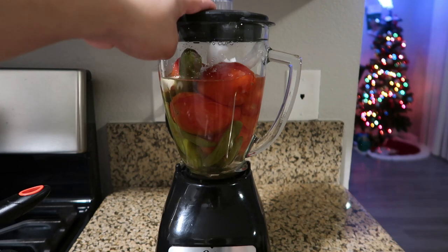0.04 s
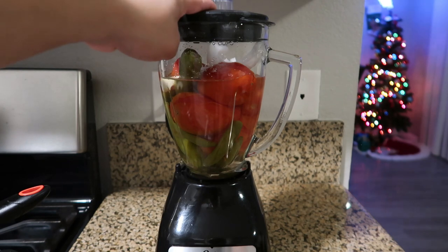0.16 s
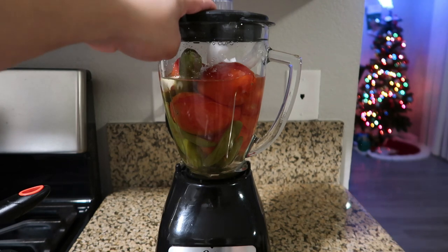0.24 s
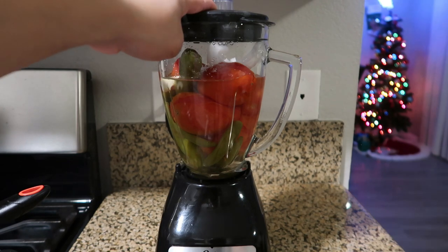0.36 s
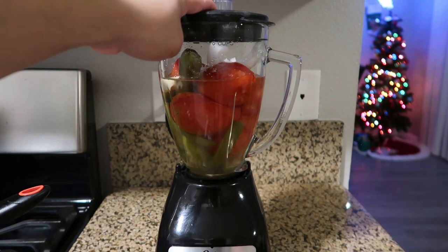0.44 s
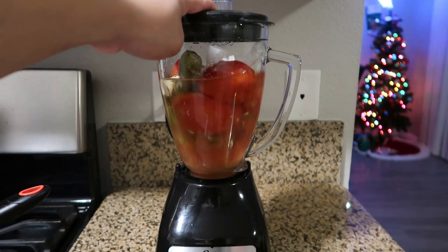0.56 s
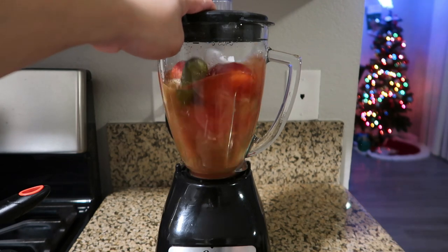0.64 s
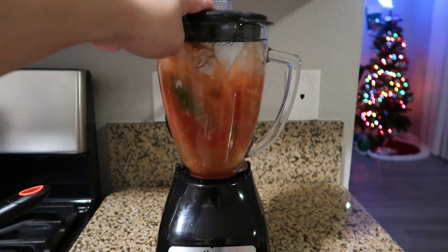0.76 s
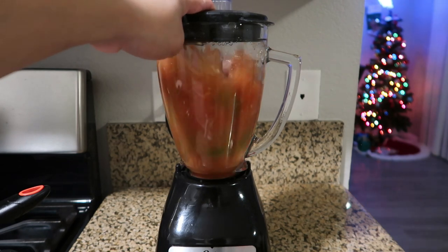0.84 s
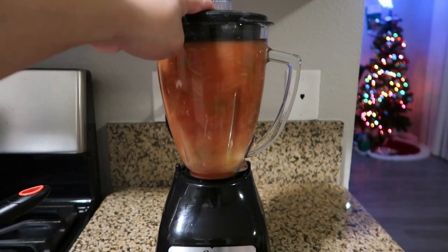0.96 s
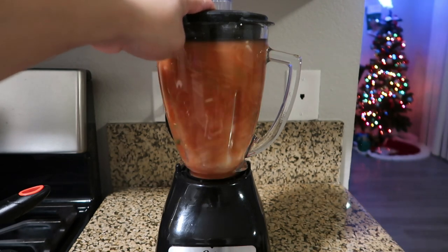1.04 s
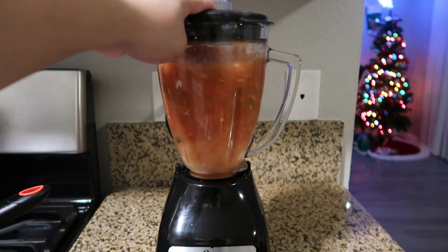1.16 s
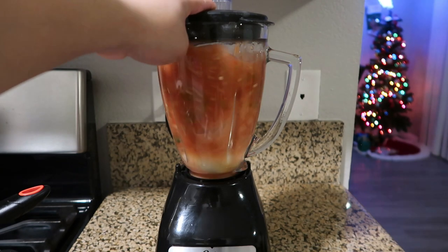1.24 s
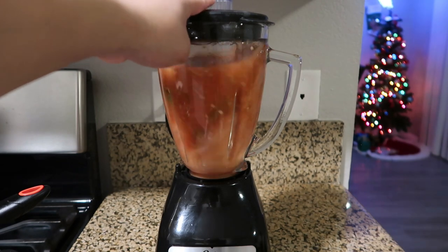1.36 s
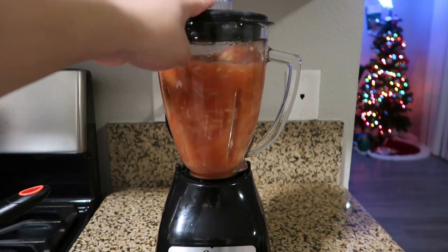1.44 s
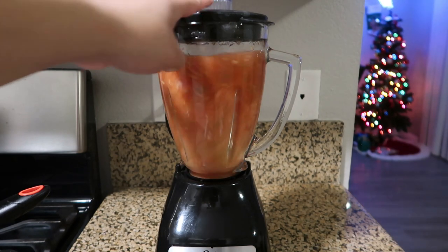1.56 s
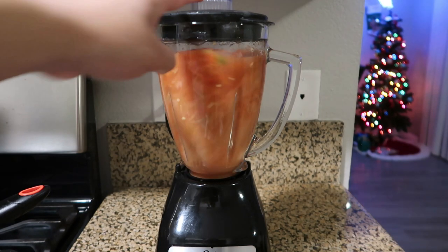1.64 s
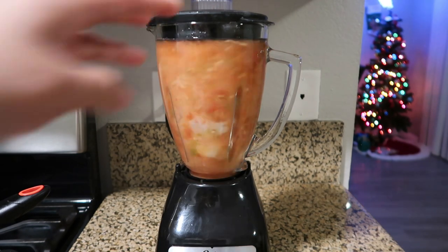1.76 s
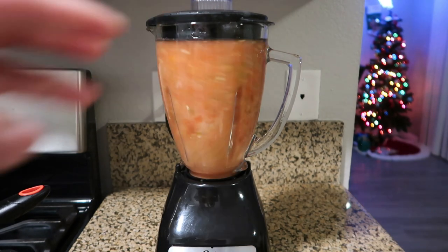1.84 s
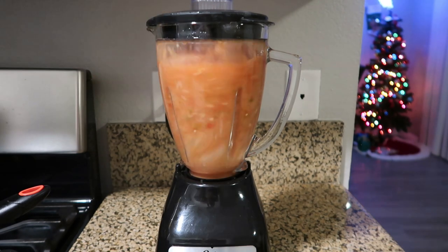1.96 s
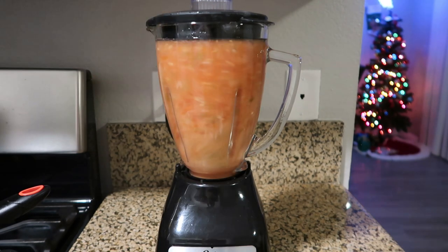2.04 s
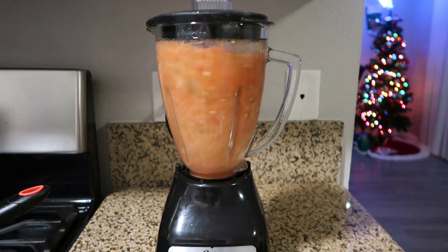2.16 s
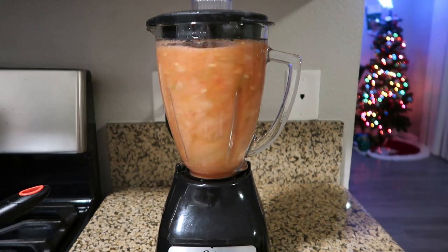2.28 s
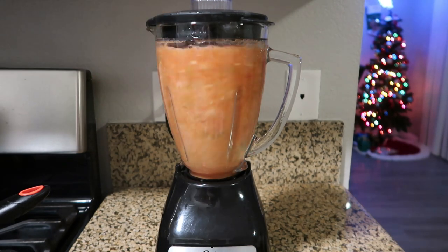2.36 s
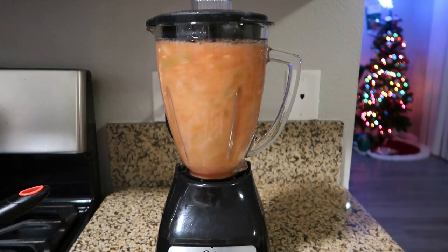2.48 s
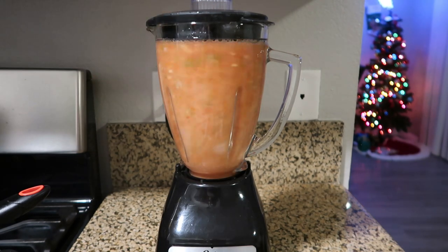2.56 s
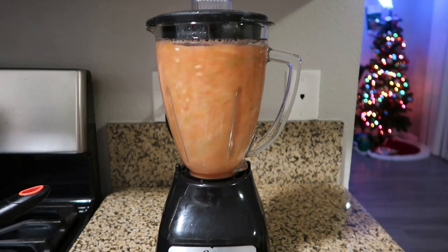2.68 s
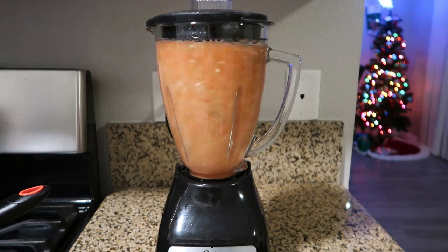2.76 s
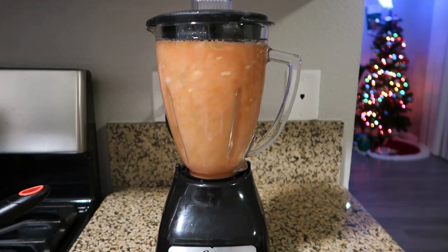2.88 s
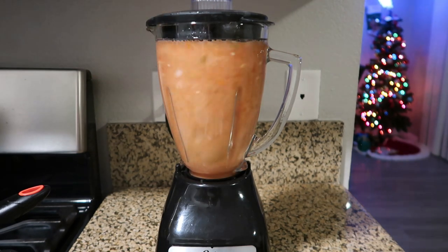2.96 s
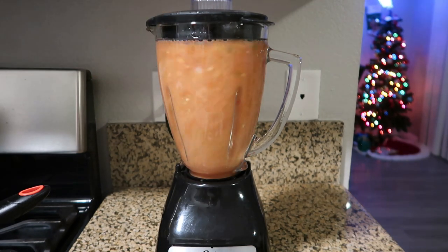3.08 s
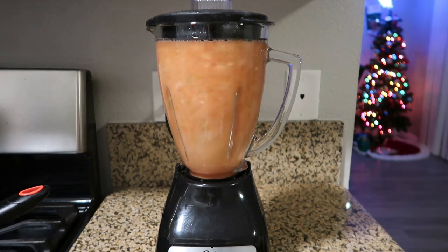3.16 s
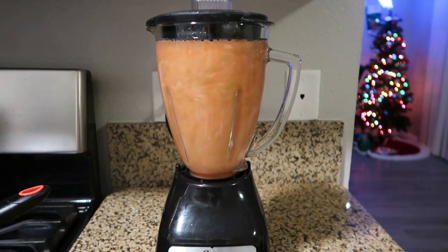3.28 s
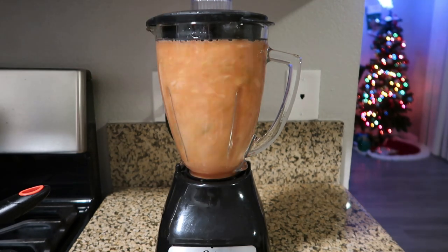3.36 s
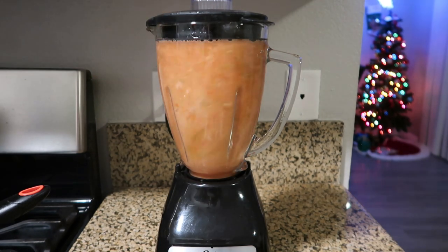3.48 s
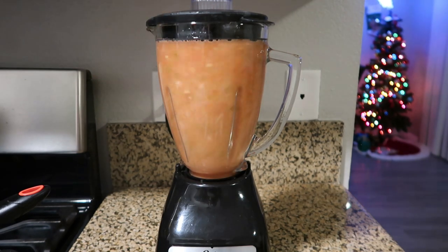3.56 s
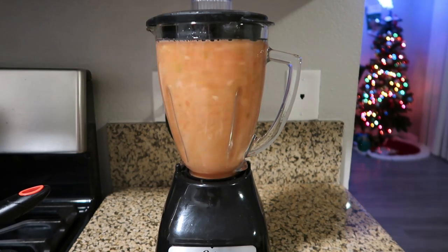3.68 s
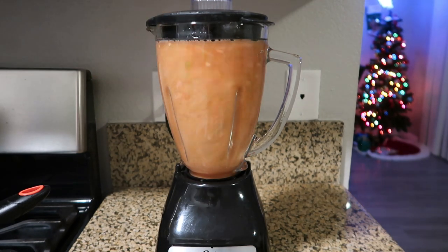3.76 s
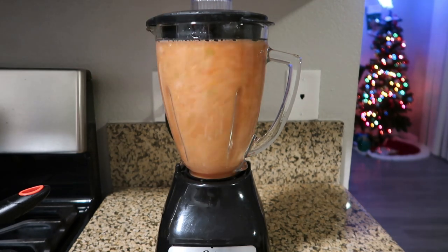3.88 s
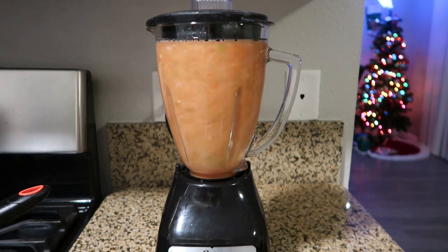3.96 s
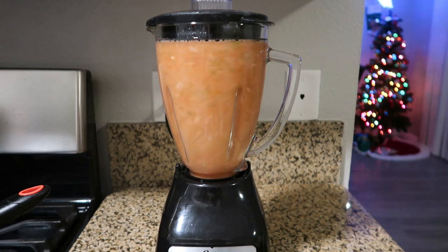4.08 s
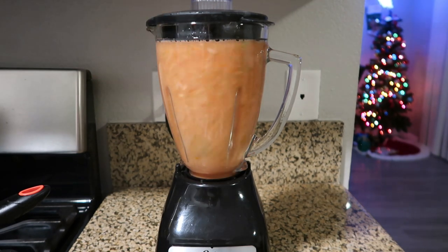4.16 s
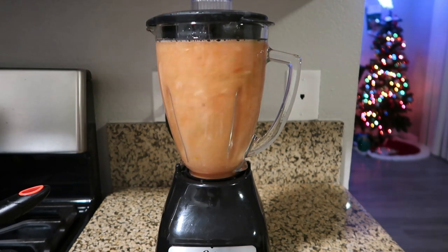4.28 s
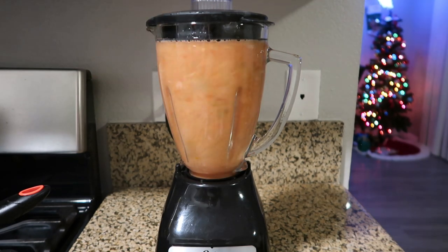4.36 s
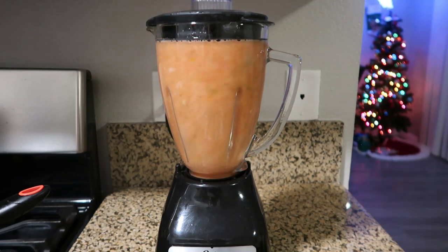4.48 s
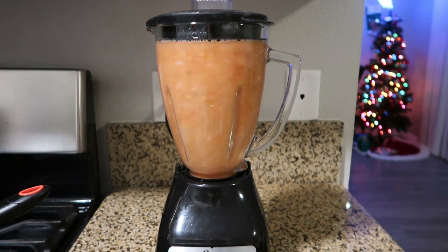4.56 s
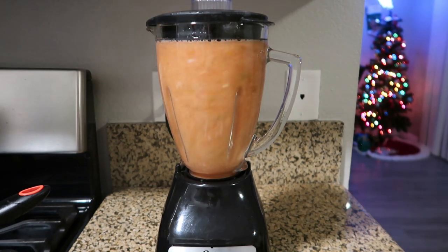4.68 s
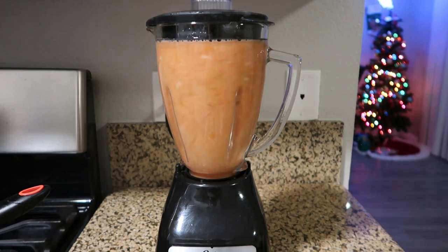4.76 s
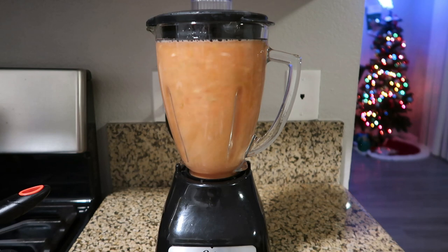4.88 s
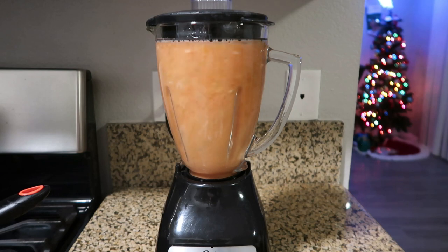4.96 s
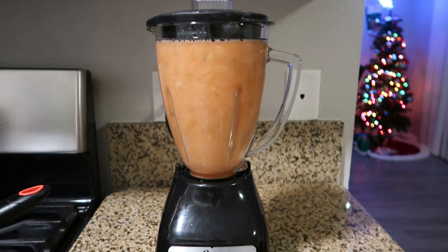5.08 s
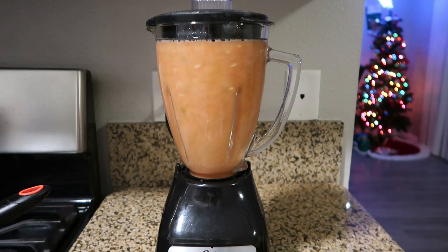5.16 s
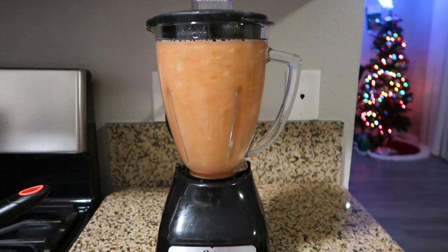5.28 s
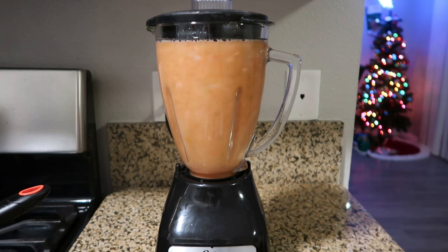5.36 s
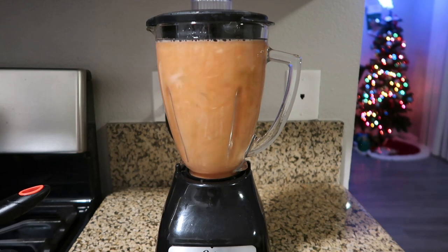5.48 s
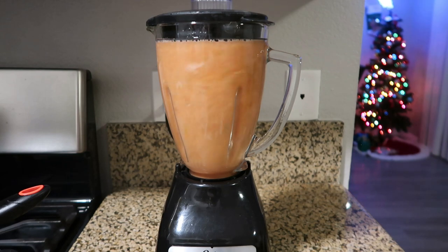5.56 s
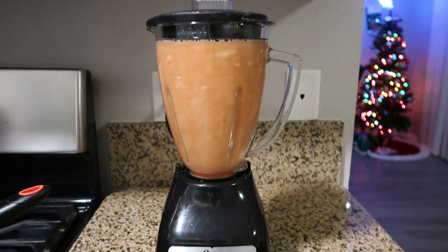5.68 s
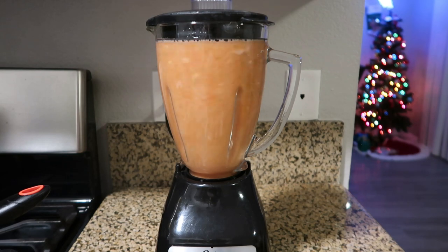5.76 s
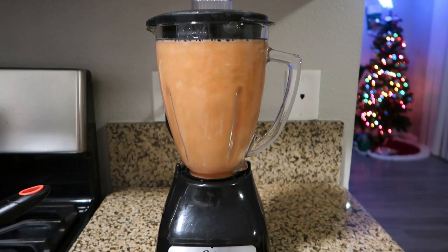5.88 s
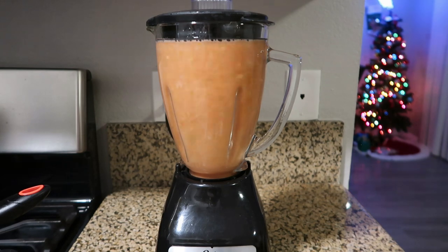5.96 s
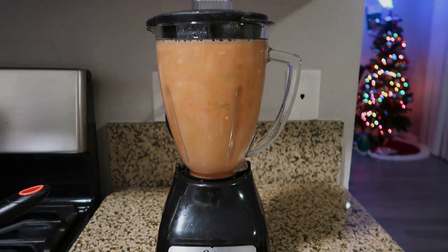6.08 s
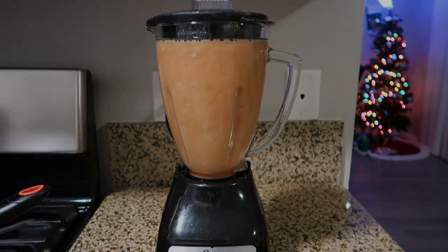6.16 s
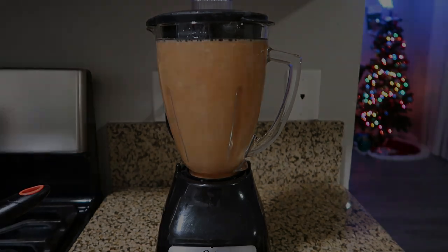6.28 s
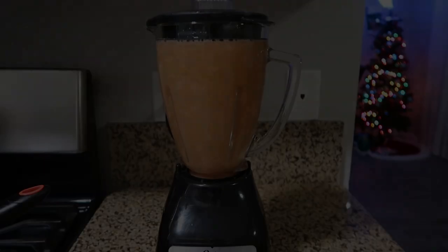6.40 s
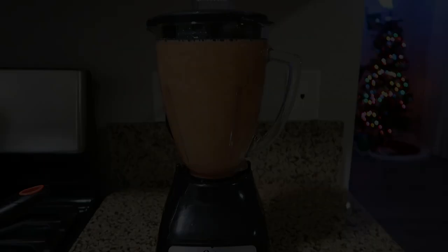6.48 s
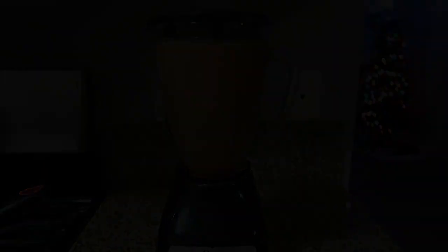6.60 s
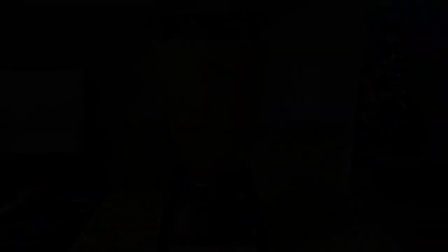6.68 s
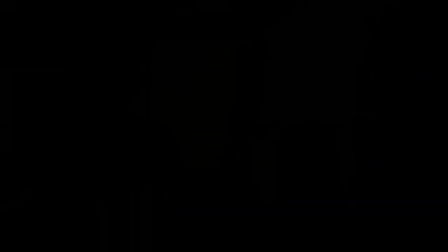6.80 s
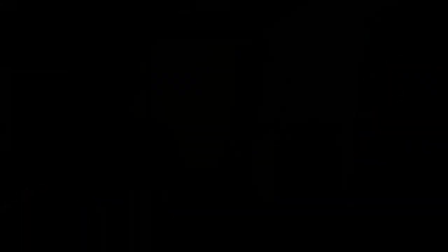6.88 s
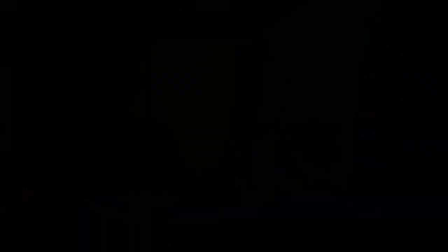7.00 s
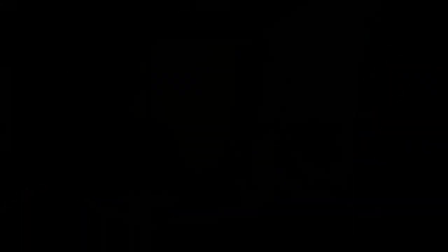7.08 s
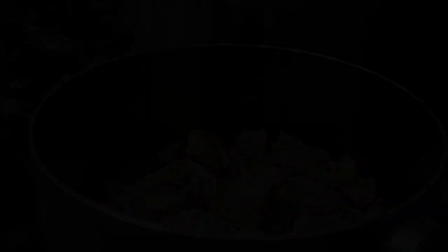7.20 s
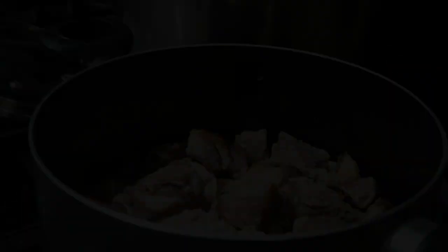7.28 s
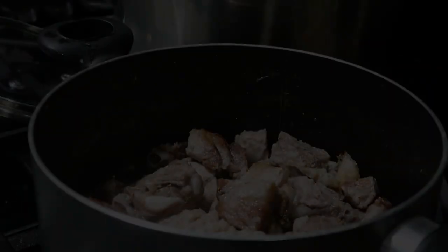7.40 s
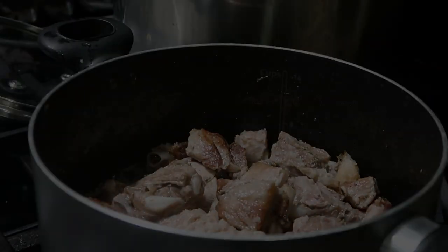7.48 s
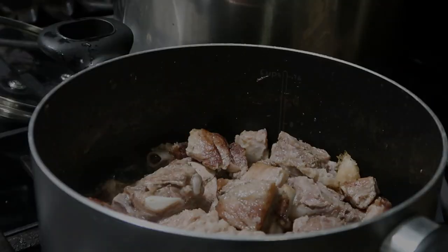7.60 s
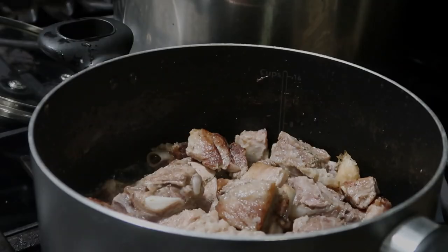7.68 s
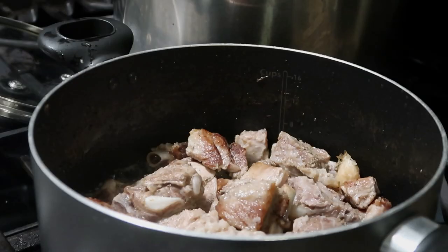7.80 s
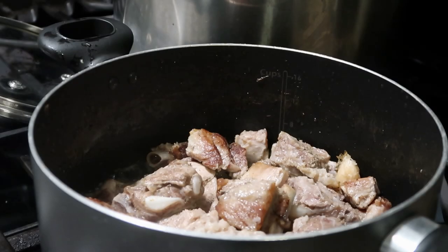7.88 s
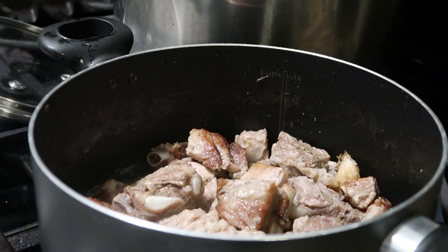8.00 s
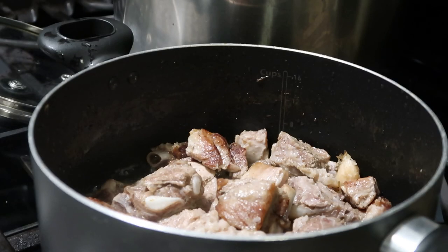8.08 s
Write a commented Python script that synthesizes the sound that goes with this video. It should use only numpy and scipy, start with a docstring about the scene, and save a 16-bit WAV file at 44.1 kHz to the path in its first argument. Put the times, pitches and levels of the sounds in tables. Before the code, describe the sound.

A kitchen blender snaps on and grinds whole vegetables, speeding up into a steady whining roar that gradually fades out.

```python
"""A countertop blender is switched on and labours through whole vegetables, in a kitchen where a fan hums.
The switch snaps, the held-back motor buzzes, and big pieces knock against the glass jar. The motor speeds
up, sags once and settles to a steady whine, while the churning pulp roars through the jar and housing.
The sound fades out in small steps, and the kitchen returns for a moment, closer to the fan."""
import sys
import numpy as np
from scipy import signal
from scipy.fft import irfft
from scipy.io import wavfile
from scipy.ndimage import uniform_filter1d

SR = 44100
rng = np.random.default_rng(int(sys.argv[2]) if len(sys.argv) > 2 else 0)


def dump_mix(stems):
    """Bounce the given channels to the path in sys.argv[1] as a 16-bit WAV at rate SR."""
    frames = np.atleast_2d(stems).T  # one column per channel
    limited = np.clip(frames, -1, 1)  # hard clip at full scale
    pcm = np.round(limited * 32767).astype(np.int16)
    wavfile.write(sys.argv[1], SR, pcm)


N = 358929
SWITCH_S, PUREED_S = .5533, 2.0  # when the switch snaps; when the chunks are cut up
MAINS_HZ, STALL_HZ = 242, 127  # pitch of the electric buzz; shaft speed below which the motor is stalled


def gain_of(db):
    return 10 ** (np.asarray(db) / 20)


def evened(x):
    """Scales a signal to an average power of 1."""
    return x / np.sqrt(np.mean(x ** 2) + 1e-20)


def at_pitch(points, hz):
    """Reads a curve of (Hz, value) points at any pitch."""
    f, value = np.transpose(points)
    return np.interp(np.log(hz + 1), np.log(f + 1), value)


def at_time(rows, t):
    """Glides between rows of (seconds, values..), giving one curve for each value."""
    s, *columns = np.transpose(rows)
    return [np.interp(t, s, column) for column in columns]


def humps(modes, hz):
    """Power gain of resonances, the pitches at which a thing likes to ring."""
    return sum(gain_of(db) ** 2 / (1 + (2 * (hz - f) / width) ** 2) for f, width, db in modes)


def swells(rows, t):
    """Brief bell-shaped rises and dips, added up in dB."""
    return sum(db * np.exp(-((t - s) / length) ** 2) for s, length, db in rows)


def wander(rate_hz):
    """A random drift of typical size 1; a higher rate makes it quicker."""
    steps = rng.standard_normal(N // 64 + 2)
    smooth = signal.lfilter([1], [1, -np.exp(-2 * np.pi * rate_hz * 64 / SR)], steps)
    return np.interp(np.arange(N) / 64, np.arange(len(smooth)), evened(smooth))


def wavering_tone(hz, width_hz, steady):
    """A tone smeared at random over a width of pitch, with a steady part."""
    phase = 2 * np.pi * hz * np.arange(N) / SR
    return evened((steady + wander(width_hz)) * np.cos(phase) + wander(width_hz) * np.sin(phase))


def ring(start_s, modes):
    """Dying tones, each given as (Hz, dB, seconds to fall by 60 dB)."""
    out, t = np.zeros(N), np.arange(6000) / SR
    tones = sum(gain_of(db - 60 * t / t60) * np.sin(2 * np.pi * hz * t) for hz, db, t60 in modes)
    part = out[round(start_s * SR):][:6000]
    part += tones[:len(part)]
    return out


def dulled(x, hz, order=2):
    """Softens the treble above hz."""
    return signal.lfilter(*signal.butter(order, hz, fs=SR), x)


def coloured(sound, colour_db):
    """Turns each pitch up or down over time by colour_db(Hz, seconds)."""
    hz, s, spectrum = signal.stft(sound, SR, nperseg=2048, noverlap=1536)
    spectrum = spectrum * gain_of(colour_db(hz[:, None], s))
    return signal.istft(spectrum, SR, nperseg=2048, noverlap=1536)[1][..., :N]


def air_and_hum(air, air_db, fan):
    """Air noise and fan tones, as mid (what both ears share) and side (how they differ)."""
    mid, side = coloured(rng.standard_normal((2, N)), lambda hz, s: at_pitch(air, hz))
    hum = sum(gain_of(db) * wavering_tone(hz, width, steady=3.3) for hz, width, db in fan)
    level = gain_of(air_db) / np.std(mid)
    return np.array([mid * level + hum, side * level])


def fan_whistle(t):
    """A faint fan whistle that weakens early on."""
    return gain_of(-52 - 9 * (t > .24)) * wavering_tone(1445, 5.6, steady=3.5)


# The kitchen air. Each row: pitch in Hz, relative level in dB.
KITCHEN_AIR = [(15, -43), (25, -7), (53, -22), (91, -9.5), (190, -7.5), (280, -11.5), (500, -17),
               (900, -18.5), (1660, -24), (5000, -30.5), (11000, -45), (15500, -65)]
# The fan's hum. Each row: pitch in Hz, width in Hz, level in dB.
FAN_HUM = [(61.5, 1.4, -48.5), (120, 3, -58), (200, 3, -51), (237, 4.3, -44.5), (369, 2.7, -56),
           (459, 4, -59.5), (890, 4, -60), (1150, 2, -67)]
def kitchen(t):
    """Air and a humming fan; their level drops over about half a second after the switch snaps."""
    sink_db = 2.5 - 12.5 * np.clip((t - SWITCH_S) / .46, 0, 1)
    return gain_of(sink_db) * air_and_hum(KITCHEN_AIR, -43, FAN_HUM)


# The air near the fan. Each row: pitch in Hz, relative level in dB.
NEAR_AIR = [(15, -38), (30, -12), (60, -11), (100, -17), (150, -2.5), (240, -14), (410, -21), (1340, -26.5),
            (5580, -34.5), (11000, -50.5), (15500, -61)]
# The hum near the fan. Each row: pitch in Hz, width in Hz, level in dB.
NEAR_HUM = [(58.7, 7.4, -38), (145.5, 8.9, -39), (242, 5.9, -39.5), (350, 9, -49)]
def near_fan(t):
    """The kitchen at the very end: louder air and hum, a thin steady whistle and one small tick."""
    tick = ring(8.075, [(3000, -35, .012), (3900, -35, .012)])
    whistle = gain_of(-44.5) * np.sin(2 * np.pi * 1430 * t)
    entry = np.clip((t - 7.9915) / .0076, 0, 1)
    return (air_and_hum(NEAR_AIR, -35.5, NEAR_HUM) + tick + whistle) * entry


def room(sound, echo_s=.3, echo_db=-14):
    """Hard kitchen walls add a short, duller echo to mid and side."""
    t = np.arange(SR // 2) / SR
    echo = rng.standard_normal((2, len(t))) * gain_of(-60 * t / echo_s) * (t > .003)
    echo = dulled(echo, 5070, order=1)
    echo *= gain_of(echo_db) / np.linalg.norm(echo[0])
    echo[:, 0] = 1  # the direct sound
    return signal.oaconvolve(sound, echo / np.linalg.norm(echo[0]), axes=1)[:, :N]


def finger_brush(t):
    """Skin rustles softly on the plastic switch just before it snaps."""
    rustle = signal.lfilter(*signal.butter(2, (1500, 3200), "band", fs=SR), rng.standard_normal(N))
    return gain_of(-43) * evened(rustle) * np.exp(-((t - .464) / .013) ** 2)


# The plastic switch ringing. Each row: pitch in Hz, level in dB, seconds to fall by 60 dB.
SWITCH_RINGS = [(286, -13, .06), (610, -13, .03), (900, 0, .006), (1330, -5, .03), (1670, -2, .022),
                (2070, 3, .016), (2470, 2, .008), (3230, -5, .008), (3990, -13, .03), (5250, -20, .012)]
def switch_snap(t):
    """The switch gives a little, then snaps with a dull crack; its contact bounces once."""
    age = t - SWITCH_S
    crack_db = -9 - 60 * np.where(age > 0, age / .006, -age / .012)
    crack = evened(dulled(rng.standard_normal(N), 3500)) * gain_of(crack_db) * (age > -.004)
    snap = ring(SWITCH_S, SWITCH_RINGS)
    bounce = gain_of(-10) * ring(SWITCH_S + .0031, SWITCH_RINGS)
    return gain_of(-7) * ((snap + bounce) * np.clip(age / .0004, 0, 1) + crack)


# The squeal comes and goes. Each row: middle in seconds, rough length in seconds, change in dB.
SQUEAL_CHANGES = [(.63, .03, 12), (.69, .02, 11), (.77, .03, 10), (.82, 0.034, 7), (.93, .05, -7),
                  (1.01, .02, 12), (1.06, .025, 14), (1.19, .04, 3), (1.27, .03, 9), (1.37, .04, 12),
                  (1.77, .08, 5), (2.55, .12, 5), (3.0, .2, -4), (3.75, .3, 7), (4.25, .1, 10),
                  (5.4, .2, 5), (5.97, .08, 11), (6.6, .4, -4)]
def bearing_squeal(t):
    """A thin, flickering squeal from the bearing, louder at first."""
    level_db = -47.5 + 4 * np.exp(-(t - SWITCH_S) / 1.5) + 1.5 * wander(3.3) + swells(SQUEAL_CHANGES, t)
    return gain_of(level_db) * wavering_tone(8190, 45, steady=.5)


def winding_buzz(t, shaft_hz):
    """The motor's coils buzz while the shaft is held back, and fall quiet as it speeds up."""
    level_db = -24 - .3888 * np.maximum(shaft_hz - STALL_HZ, 0) + 2.1 * wander(9)
    return gain_of(level_db) * np.cos(2 * np.pi * MAINS_HZ * t)


# How loudly the counter sounds the shaft's tone. Each row: turns per second, level in dB.
COUNTER_LEVELS = [(110, -30.5), (135, -31.5), (165, -20.5), (195, -22.5), (212, -23.5), (223, -28),
                  (232, -22), (240, -19)]
def shaft_hum(shaft_hz, angle, shake):
    """The off-balance shaft shakes the counter once a turn, and growls while it is stalled."""
    tone = gain_of(at_pitch(COUNTER_LEVELS, shaft_hz) + 3.1 * shake * wander(6.7)) * np.cos(angle)
    growl = .8 * np.clip((1.2 * STALL_HZ - shaft_hz) / 30, 0, 1)
    return tone * (1 - growl / 2 + growl * wander(25))


# The blades' tones. Each row: multiple of the shaft speed, relative level in dB.
BLADE_TONES = [(2, -8.5), (3, -3.5), (4, -5.5), (5, -6), (10, -0.5), (15, -17)]
# Resonances that lift a blade tone passing through. Each row: pitch in Hz, width in Hz, strength in dB.
BLADE_RESONANCES = [(434, 14, 7.5), (459.7, 11, 5.5), (640, 40, 4.5), (680, 17.2, 10), (905, 30, 9.5)]
def blade_tones(shaft_hz, angle):
    """The blades sing at multiples of the shaft speed, louder as they spin faster."""
    tones = 0
    for multiple, db in BLADE_TONES:
        tone = np.cos(multiple * angle + .4 * wander(6))
        flutter = .9 + .25 * wander(8)
        lift = np.sqrt(1 + humps(BLADE_RESONANCES, multiple * shaft_hz))
        tones += gain_of(db) * tone * flutter * lift
    return gain_of(-30.5) * (shaft_hz / 243) ** .71 * tones


# Housing resonances that the whine sweeps through. Each row: pitch in Hz, width in Hz, level in dB.
WHINE_RESONANCES = [(1990, 120, -23.5), (2320, 73, -24), (2556, 69, -19), (2660, 45, -16), (2760, 30, -30),
                    (2847, 35, -20.5), (2895, 47, -19)]
# The whine flares or drops out. Each row: middle in seconds, rough length in seconds, change in dB.
WHINE_FLARES = [(1.11, .03, 3), (1.21, .03, 3), (1.33, 0.035, 0), (1.41, 0.023, 2), (1.48, 0.037, -1),
                (1.58, 0.036, -2), (1.68, 0.037, 5), (1.76, 0.024, 1), (1.9, 0.082, 1), (2.05, 0.058, 1),
                (2.15, 0.11, 2), (2.19, 0.053, -4.5), (2.25, 0.035, 4), (2.31, 0.028, -3),
                (2.37, 0.045, 6.5), (2.53, 0.084, -23), (3.0, 0.029, 0), (3.23, 0.082, -13),
                (3.45, 0.18, -9), (3.66, 0.075, 8.5), (3.75, 0.033, -4), (3.86, 0.081, 3),
                (4.0, 0.023, -12), (4.07, .04, 4), (4.4, 0.031, -12), (4.8, 0.062, 1), (4.88, 0.024, -8),
                (5.04, 0.017, -21), (5.34, 0.068, -8), (5.68, 0.076, -4), (5.78, 0.028, -5),
                (5.95, 0.071, -2.5), (6.15, 0.065, -5), (6.602, 0.034, -8), (7.13, .05, -6), (7.55, .3, 1)]
def slot_whine(t, shaft_hz, angle, shake, slots=12):
    """The motor's slots whine as they spin past; chopping spreads the whine over nearby resonances."""
    phase = slots * angle
    whine = gain_of((1.7 + 4 * shake) * wander(20)) * np.cos(phase)
    whine *= np.sqrt(humps(WHINE_RESONANCES, slots * shaft_hz) + gain_of(-37) ** 2)
    spread = 1.2 * shake * (wander(70) * np.cos(phase) + wander(70) * np.sin(phase))
    spread = coloured(spread, lambda hz, s: 10 * np.log10(humps(WHINE_RESONANCES, hz)))
    return (whine + spread) * gain_of(swells(WHINE_FLARES, t))


# The motor's speed. Each row: time in seconds, turns per second.
SHAFT_SPEED = [(.6, 115), (1.02, 120), (1.09, 157), (1.18, 184), (1.3, 208.3), (1.39, 218), (1.43, 217),
               (1.46, 213), (1.52, 209.5), (1.58, 202), (1.72, 184.5), (1.79, 169), (1.82, 170),
               (1.94, 205), (2.0, 208), (2.1, 210), (2.15, 213), (2.22, 222), (2.45, 225.5), (2.63, 229.5),
               (3.05, 232), (3.55, 233), (3.62, 235.6), (4.3, 235.2), (4.39, 234.4), (4.44, 237),
               (4.82, 236.8), (4.92, 238.8), (5.35, 237.4), (5.55, 236.8), (5.73, 234.2), (5.82, 236),
               (5.95, 236.6), (6.04, 238.3), (6.5, 238.4), (7, 239), (7.2, 238.2), (8, 238.8)]
def shaft_speed(t):
    """The shaft labours, speeds up, sags once and settles."""
    return at_time(SHAFT_SPEED, t)[0]


def motor(t):
    """The motor's low hum and high whine; lumps shake the shaft until they are cut up."""
    shaft_hz = shaft_speed(t)
    shake = .04 + .41 / (1 + np.exp((t - PUREED_S) / .1))
    angle = 2 * np.pi * np.cumsum(shaft_hz * (1 + .027 * shake * wander(35))) / SR
    hum = shaft_hum(shaft_hz, angle, shake)
    whine = blade_tones(shaft_hz, angle) + slot_whine(t, shaft_hz, angle, shake)
    low = np.sqrt(2) * (hum + winding_buzz(t, shaft_hz))
    high = np.sqrt(2) * whine + bearing_squeal(t)
    on = np.clip((t - .58) / .11, 0, 1)
    return on * low, on * high


# Pieces thrown at the glass. Each row: time in seconds, strength in dB.
KNOCK_HITS = [(0.666, 4), (0.703, 1.5), (0.724, 5.5), (0.749, -1), (.79, -5), (0.825, 3.5), (0.872, 9.5),
              (.941, 5.5), (1.04, -1), (1.081, 2), (1.11, 5), (1.149, 2), (1.174, 7.5), (1.197, 4),
              (1.555, 7), (1.726, -2), (1.763, 6), (1.829, 2.5), (1.941, 7.5), (2.064, 3)]
def knocks(t, rise_s, decay_s, offset=0):
    """One short push for each piece that hits the jar; offset is added to each one's gain."""
    return sum((gain_of(db) + offset) * np.exp(-abs(t - s) / decay_s)
               * np.clip((t - s) / rise_s + 1, 0, 1) for s, db in KNOCK_HITS)


# What a knock rings in the full jar. Each row: pitch in Hz, width in Hz, relative level in dB.
THUD_RINGS = [(610, 53, -15), (875, 90, -9), (1180, 120, 2.5), (1890, 140, -12)]
def jar_thuds(t):
    """Each knock is a puff of force that rings the full jar."""
    force = dulled(knocks(t, rise_s=.0054, decay_s=.016) * rng.standard_normal(N), 3000)
    rings = 0
    for hz, width, db in THUD_RINGS:
        ringing = signal.lfilter(*signal.iirpeak(hz, hz / width, fs=SR), force)
        rings += gain_of(db) * np.sqrt(SR / width) * ringing
    return gain_of(-8.5) * rings / np.sqrt(len(THUD_RINGS) * np.pi)


# Churning pulp, and blades in whole vegetables. Each row: pitch in Hz, relative level in dB.
PULP_NOISE = [(18, -80), (30, -29), (70, -26), (120, -29), (200, -20.5), (300, -20), (520, -27), (700, -14),
              (1200, -15.5), (1600, -17), (2700, -10), (3300, -14), (10500, -30.5), (13300, -41),
              (15500, -64)]
LUMP_NOISE = [(18, -75), (30, -40), (60, -31.5), (114, -13.5), (197, 5), (230, -1), (284, -7), (606, -1.5),
              (921, -12.5), (1170, -7.5), (1290, -8.5), (8280, -31), (12900, -45.5), (15500, -67)]
# Four sets of resonances. Each row: pitch in Hz, width in Hz, strength in dB compared with the roar.
BODY_RINGS = [(328, 12.4, 7), (358, 17.7, 9), (440, 17, 6), (450, 20, 4), (600, 110, 0), (802, 34, 8),
              (870, 22, 7.5), (923, 16, 5.5), (1013, 15, 13.5), (1092, 25, 9.5), (1180, 32, 9),
              (1225, 37, 10.5), (1444, 16, 6.5), (1773, 44, 9), (1871, 37, 7.5), (2027, 34, 11.5),
              (2310, 30, 11), (2430, 13, -4), (2548, 40, 8.5), (2669, 45, 10.5), (3050, 29, 5),
              (3491, 40, 9), (3920, 32, 5), (4520, 330, 3), (5610, 98, 1.5), (6180, 90, 4.5),
              (6880, 160, 4)]  # housing, glass jar and counter
PRESSED_RINGS = [(232, 23, 19.5), (613, 110, 19), (1100, 470, 18.5), (1900, 74, -13), (6360, 150, 8),
                 (7040, 100, 12)]  # big pieces pressing on the jar
CHUNK_RUMBLE = [(460, 100, 4.5)]  # chunks rumbling until they are cut up
BLADE_RASP = [(347, 45, 7), (1380, 290, 1.5), (4560, 450, 3.5)]  # freed blades rasping through chunks
def jar_colour(hz, s, lumps):
    """The roar's tone colour in dB; big pieces damp the housing and bring rings of their own."""
    chunky = 1 / (1 + np.exp((s - PUREED_S) / .025))
    freed = shaft_speed(s) > STALL_HZ
    peaks = (1 - .29 * lumps) * humps(BODY_RINGS, hz) + lumps ** 4 * humps(PRESSED_RINGS, hz)
    peaks += chunky * (humps(CHUNK_RUMBLE, hz) + freed * humps(BLADE_RASP, hz))
    noise_db = (1 - lumps) * at_pitch(PULP_NOISE, hz) + lumps * at_pitch(LUMP_NOISE, hz)
    return noise_db + 10 * np.log10(1 + peaks)


# The churning in the jar. Each row: time in seconds, level in dB, lumpiness from 0 to 1.
CHURNING = [(.56, -19, 0.6), (.6, -26.5, 0.58), (.65, -22, 0.49), (.71, -19.5, 0.69), (.82, -21, 0.56),
            (1.05, -22, 0.53), (1.08, -18.5, 0.49), (1.14, -17, 0.4), (1.19, -18.5, 0.25),
            (1.25, -17, 0.34), (1.57, -17.5, 0.38), (1.9, -19.5, 0.46), (2.0, -16, 0.33),
            (2.06, -17.5, 0.37), (2.3, -17.5, 0.33), (2.7, -17, 0.3), (3.5, -16, 0.29), (5, -17.5, 0.25),
            (5.3, -18, 0.29), (6, -16.5, 0.21), (7, -16.5, 0.22), (7.9, -18.5, 0.27)]
def jar_roar(t, strikes_per_s=300):
    """Swirling pulp, blade strikes and thudding pieces sound through the jar and housing: mid and side."""
    level_db, lumps = at_time(CHURNING, t)
    strike_sizes = gain_of(5 * np.minimum(rng.exponential(1, N), 3))
    struck = rng.random(N) < strikes_per_s / SR
    strikes = evened(uniform_filter1d(strike_sizes * struck, 80))
    throb = 1 + .016 * np.cos(np.pi * MAINS_HZ * t)  # at half the pitch of the buzz
    slosh = gain_of((.3 + 1.94 * lumps) * wander(6.3))
    hiss = rng.standard_normal((2, N))
    bumps = dulled(hiss, 4500) * knocks(t, rise_s=.0018, decay_s=.0064, offset=-1)  # soft pieces are dull
    churn = (hiss * (1 + .04 * strikes) + bumps) * throb * slosh
    roar = coloured(churn, lambda hz, s: jar_colour(hz, s, np.interp(s, t, lumps)))
    roar = roar / np.std(roar[0]) * (t > SWITCH_S)
    return gain_of(level_db) * (roar + jar_thuds(t))


def blender(t):
    """The whole blender as mid and side; the hum and most of the whine arrive without echo."""
    hum, whine = motor(t)
    echoing = room(jar_roar(t) + .12 * whine + switch_snap(t) + finger_brush(t))
    return echoing + .42 * whine * np.array([[1], [.18]]) + hum * np.array([[1], [.5]])


def fade_out(t, length_s=2.206, step_s=1 / 24):
    """A curved fade to silence that holds each level for one short step."""
    left_s = -np.floor((t - 7.985) / step_s) * step_s
    return np.sin(np.pi / 2 * np.clip(left_s / length_s, 0, 1)) ** 1.87 * (t < 7.973)


# How wide the air and the blender sound. Each row: pitch in Hz, gain of the side signal in dB.
AIR_WIDTH = [(60, -41), (110, -21), (200, -18), (380, -9), (700, -17), (1290, -11), (2380, -12), (4400, -7),
             (8120, 1), (15000, 6)]
BLENDER_WIDTH = [(30, -31), (130, -48), (290, -33), (450, -28), (740, -74), (1410, -28), (3100, -17.5),
                 (6820, -4), (15000, 7)]
def stereo(air, machine):
    """Turns mid and side into left and right, which differ mostly in the treble."""
    hz = np.fft.rfftfreq(1024, 1 / SR)
    mid, side = air[0] + machine[0], 0
    for source, width in (air, AIR_WIDTH), (machine, BLENDER_WIDTH):
        kernel = np.fft.fftshift(irfft(gain_of(at_pitch(width, hz))))
        side += signal.oaconvolve(source[1], kernel, "same")
    return np.array([mid + side, mid - side])


def scene():
    """Blender and kitchen fade out together; then the fan is heard from close by."""
    t = np.arange(N) / SR
    fade = fade_out(t)
    whistle = fan_whistle(t)
    machine = blender(t) * fade
    air = (kitchen(t) + whistle) * fade + near_fan(t)
    return stereo(air, machine)


def record(dry):
    """Clips any peak that is too loud, then cuts the treble above 15500 Hz."""
    treble_cut = signal.firwin(511, 15500, window=("kaiser", 9), fs=SR)
    return signal.oaconvolve(np.clip(dry, -1, 1), treble_cut[None], "same")


dry = scene()
out = record(dry)
dump_mix(out)
```